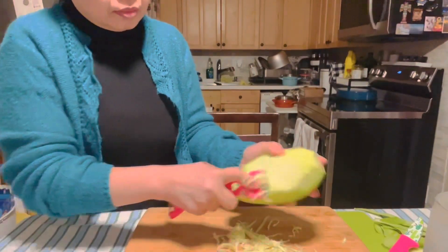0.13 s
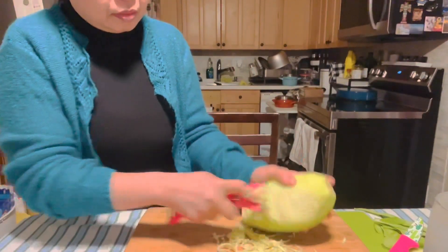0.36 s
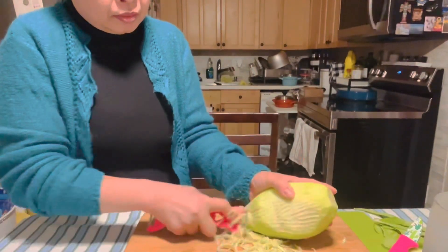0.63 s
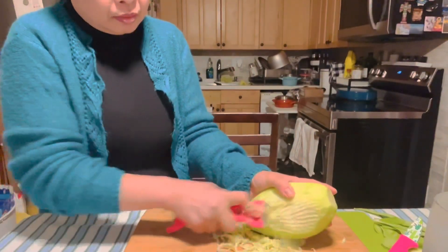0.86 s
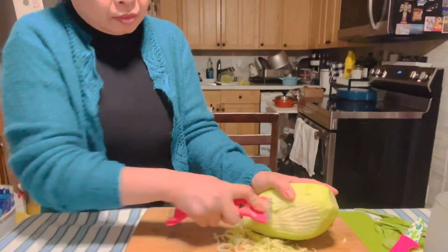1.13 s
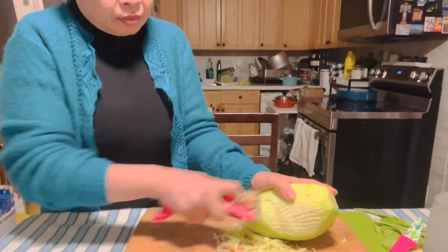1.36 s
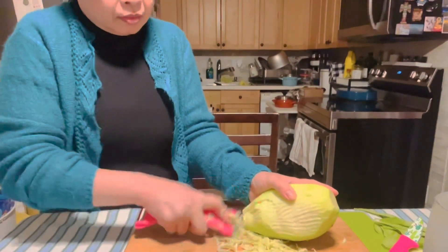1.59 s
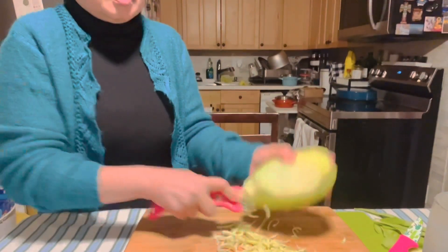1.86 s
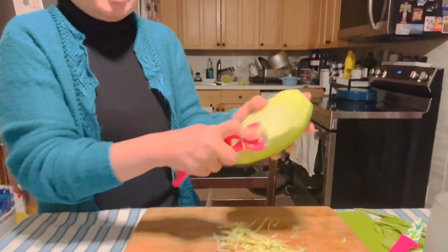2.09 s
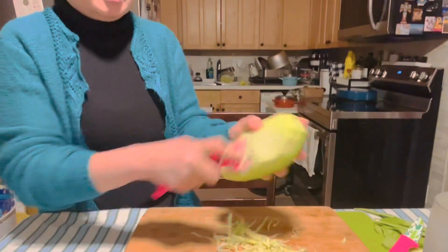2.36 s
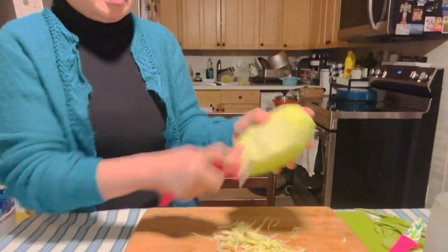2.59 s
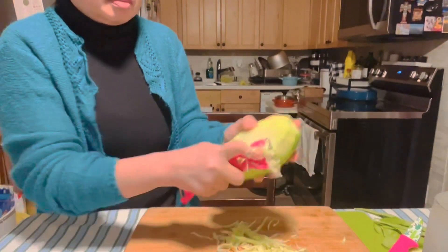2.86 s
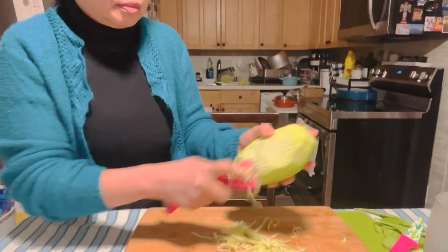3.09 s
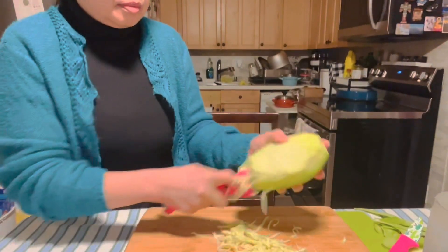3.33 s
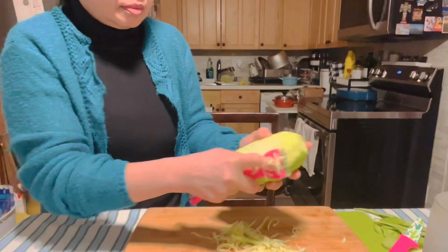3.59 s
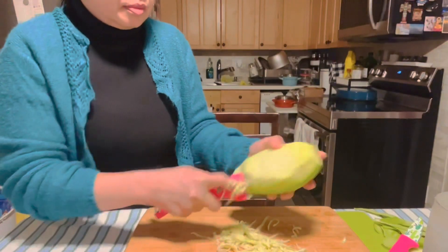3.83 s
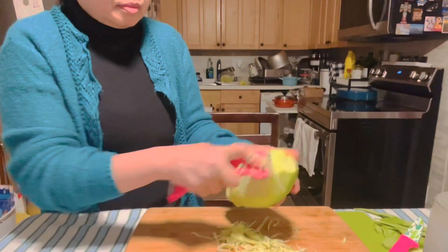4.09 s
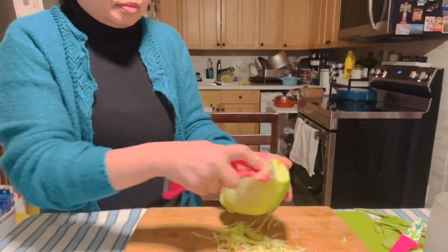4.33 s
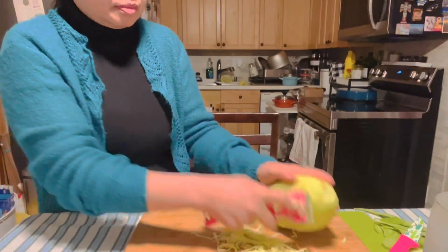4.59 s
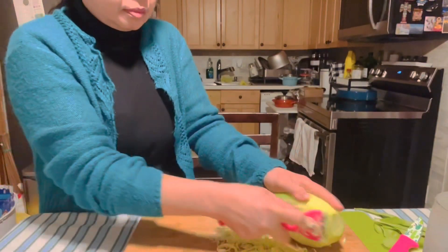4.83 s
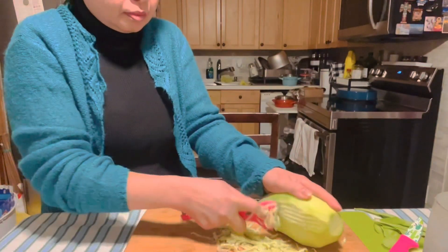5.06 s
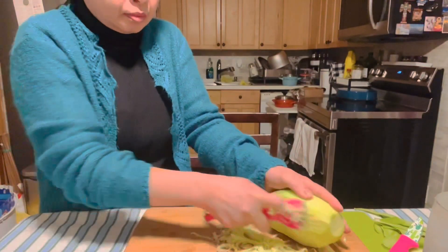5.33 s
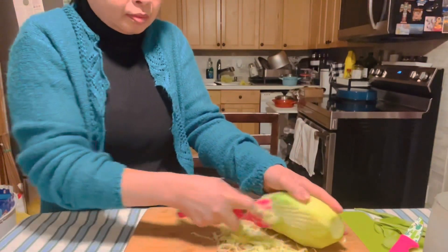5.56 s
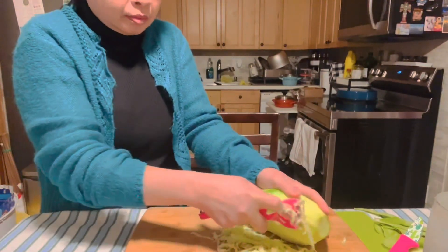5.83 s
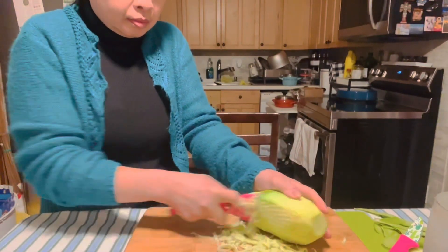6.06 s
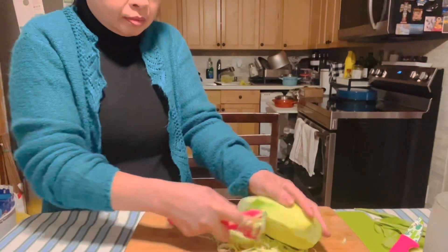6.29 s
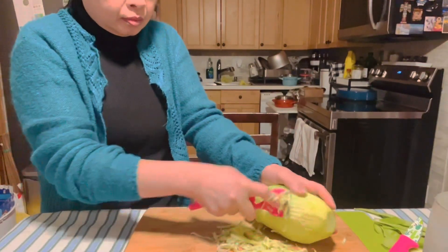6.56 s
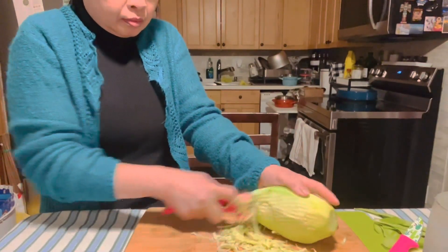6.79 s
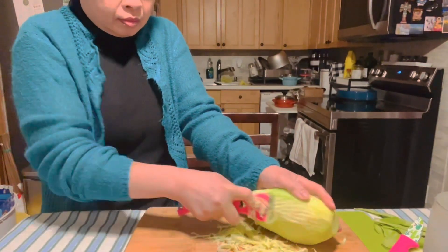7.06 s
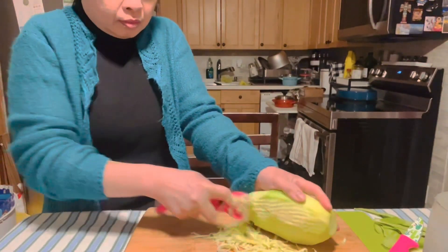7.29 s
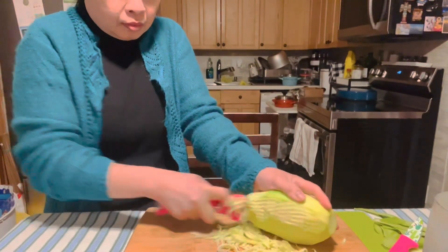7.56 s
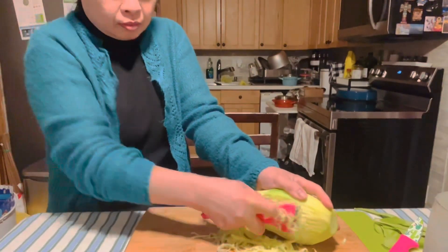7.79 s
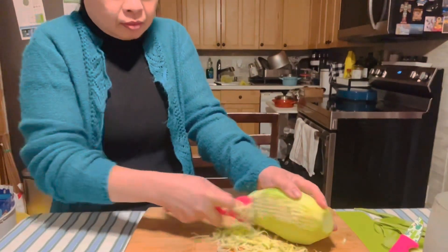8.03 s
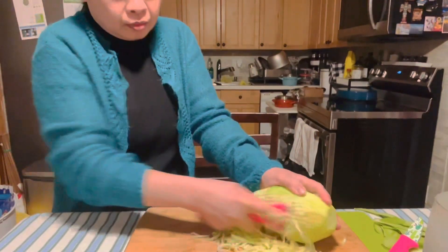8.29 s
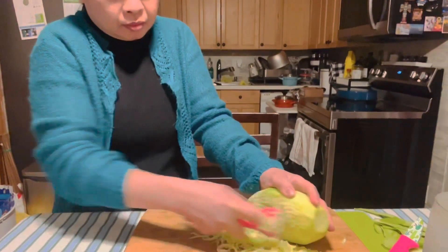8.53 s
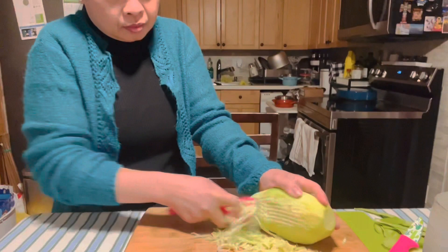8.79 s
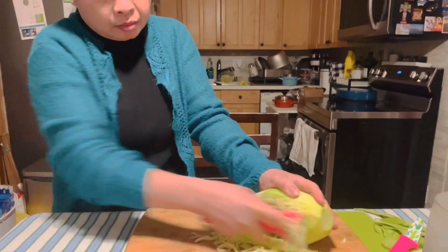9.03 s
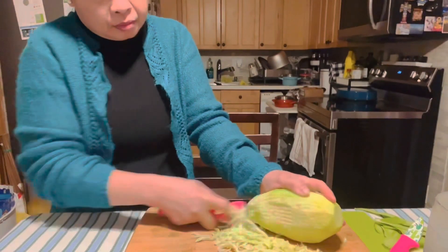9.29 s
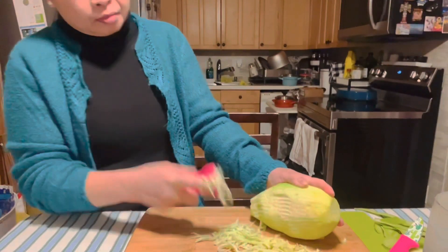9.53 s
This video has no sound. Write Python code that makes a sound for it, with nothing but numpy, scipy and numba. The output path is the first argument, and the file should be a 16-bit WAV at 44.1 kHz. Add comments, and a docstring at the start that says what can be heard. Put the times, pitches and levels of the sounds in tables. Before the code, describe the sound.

A hand shredder rasps in quick crisp strokes through a firm, wet green mango on a wooden board, with ticks, soft table thuds and faint fridge hum.

```python
"""Over a steady low kitchen rumble and a wavering fridge hum, a hand shredder ticks onto a peeled green mango
and tears its crisp flesh, stroke after stroke, while the table shakes and wet skin squeaks at times.
Tearing and juice fizz are rains of short dying sines, ticks are shaped noise, and squeaks and groans unsteady tones.
Resonances make the fruit answer dully, the thin blade ring a little, and board and table shake under the push."""
import sys
import numpy as np
from scipy import signal
from scipy.fft import rfft, irfft, next_fast_len
from scipy.io import wavfile
from scipy.ndimage import uniform_filter1d, map_coordinates
from numba import njit

SR = 44100
rng = np.random.default_rng(int(sys.argv[2]) if len(sys.argv) > 2 else 0)


def to_wav(s):
    """Save 16-bit WAV."""
    ch = np.atleast_2d(s).T  # columns
    pcm = np.round(np.clip(ch, -1, 1) * 32767)  # PCM
    wavfile.write(sys.argv[1], SR, pcm.astype(np.int16))


def boost_factor(decibels):
    """Convert a level in decibels to a linear amplitude factor."""
    exponent = np.asarray(decibels, float) / 20
    return 10 ** exponent


N = 425549
T = np.arange(N) / SR
SIZE = next_fast_len(N + SR // 2)
HZ = np.arange(SIZE // 2 + 1) * SR / SIZE
CONTROL_STEP = 22  # samples between control values


def through(x, response):
    """Linear filtering: a spectrum is multiplied by a frequency response."""
    return irfft(rfft(x, SIZE) * response, SIZE)[..., :N]


def colour(points):
    """Spectral envelope: gain through (Hz, dB) points joined on a log frequency axis."""
    hz, db = np.transpose(points)
    return boost_factor(np.interp(np.log(HZ + 1), np.log(hz), db))


def modes(resonances):
    """Modal superposition: damped resonances (Hz, width Hz, dB) add up, neighbours in opposite phase."""
    response = 0
    for k, (hz, width_hz, db) in enumerate(resonances):
        damping = 1j * HZ * width_hz
        response = response + (-1) ** k * boost_factor(db) * damping / (hz * hz - HZ ** 2 + damping)
    return response


def unit(x):
    """Power normalisation: scale to rms 1."""
    return x / np.sqrt(np.mean(x ** 2))


def walk(rate):
    """Random modulation: levels drawn about rate times a second and slewed; spread near 1."""
    k = max(int(SR / rate), 1)
    held = np.repeat(rng.standard_normal(N // k + 1), k)
    return unit(uniform_filter1d(held, k)[:N])


@njit
def rings(start, hz, cycles, size, length):
    """Damped free oscillation: each grain is a small sine that dies within some cycles."""
    out = np.zeros(length + 8192)
    for k in range(len(start)):
        z = size[k] + 0j
        turn = np.exp((2j * np.pi - 1 / cycles[k]) * hz[k] / SR)
        for i in range(min(int(3 * cycles[k] * SR / hz[k]), 8192)):
            out[start[k] + i] += z.imag
            z *= turn
    return out[:length]


def crunch(low_hz, high_hz, cycles, snap_db, patchy_db, count):
    """Granular fracture: snapping fibres give grains of scattered pitch and length; one rain for each channel."""
    # flesh tears unevenly: for some 30 ms one range of pitches snaps harder than another
    patches = patchy_db * rng.standard_normal((320, 14))
    last_cell = np.array(patches.shape)[:, None] - 1
    pair = []
    for when, pitch, snap, life in rng.random((2, 4, count)):
        hz = low_hz * (high_hz / low_hz) ** pitch
        patch_db = map_coordinates(patches, np.array([when, pitch]) * last_cell, order=1)
        size = boost_factor(patch_db - snap_db * np.log(1 - snap)) * np.sqrt(hz)
        lives = cycles * (.3 - np.log(1 - life))
        pair.append(rings((when * N).astype(np.int64), hz, lives, size, N))
    return unit(np.array(pair))


# spectrum of the room rumble: pitch_hz [Hz], level_db [dB per Hz, relative]
RUMBLE_SPECTRUM = [(18, -30.5), (30, -3.5), (194, 2.5), (461, -10), (721, -14.5), (1590, -27),
                   (5040, -26.5), (7470, -44.5), (8300, -37), (10500, -41.5), (11400, -30), (13000, -30),
                   (16000, -22.5)]


def kitchen():
    """Stationary noise and a pure tone: low room rumble that drifts, with a wavering fridge hum."""
    rumble = unit(through(rng.standard_normal((2, N)), colour(RUMBLE_SPECTRUM)))
    rumble = rumble * boost_factor(-70 + 2.4 * walk(3))
    hum_hz = 253 + .9 * walk(4)
    hum = np.sin(2 * np.pi * np.cumsum(hum_hz) / SR) * boost_factor(-73.5 + 1.5 * walk(6))
    return rumble + hum


# fruit knocks the board: start_s [s], level_db [dB, relative]
FRUIT_KNOCKS = [(0.426, -20.5), (0.457, -35.5), (0.572, -22.5), (0.6, -44), (1.239, -37), (1.556, -32),
                (1.58, -28), (4.579, -31.5), (4.598, -34), (4.641, -42), (5.24, -42), (5.727, -49),
                (6.757, -45), (7.754, -40), (8.788, -28.5), (9.182, -31.5)]
# resonances of the table: pitch_hz [Hz], width_hz [Hz], level_db [dB, relative]
TABLE_MODES = [(54, 5.1, -0.5), (85.5, 9.7, -6), (118, 19, -10), (204.4, 45, -11)]


def table_top(shake_db):
    """Forced and free vibration: the top wobbles under the sawing and rings on after each soft knock of the fruit."""
    push = np.zeros(N)
    for start_s, level_db in FRUIT_KNOCKS:
        i = int(start_s * SR)
        push[i:i + 400] += boost_factor(level_db + 6) * np.hanning(400)  # a soft contact lasts about 9 ms
    sawing = unit(through(rng.standard_normal((2, N)), modes(TABLE_MODES))) * boost_factor(shake_db - 3.5)
    return sawing + through(push, modes(TABLE_MODES))


# teeth landing, catching and fingers tapping:
# start_s [s], level_db [dB, relative], pitch_hz [Hz], thud_db [dB over the crack, relative]
TICK_EVENTS = [(0.0659, -30, 9390, -6.5), (0.0703, -17, 5100, -37), (0.1386, -24, 4970, -7.5),
               (0.4328, -30, 10500, -31), (0.4376, -13, 4800, -43), (0.5221, -28.5, 9920, 1),
               (0.5554, -18.5, 11000, -1.5), (0.7845, -23, 7500, -25), (0.7934, -25, 3710, -24),
               (1.1114, -21, 2720, -13.5), (1.2424, -22.5, 7200, -24), (1.4336, -33, 5100, -11),
               (1.5384, -24, 10600, -7), (1.7, -40.5, 1770, -12), (1.7406, -41.5, 1750, -27),
               (1.764, -11.5, 6590, -22), (1.7704, -18, 4100, -25), (1.8554, -21, 3370, -26),
               (2.0667, -40, 10300, -15), (2.0793, -26.5, 4130, -30), (2.1345, -28, 10400, -20),
               (2.302, -40, 2500, -20), (2.4418, -22.5, 5050, -29), (2.5311, -29, 10400, -13),
               (2.814, -20.5, 4690, -24), (2.822, -20, 4860, -32), (2.9033, -20, 4970, -22),
               (3.032, -38, 4500, -22), (3.1792, -36.5, 4520, -13), (3.1916, -26.5, 4650, -37),
               (3.2415, -36, 4750, -22), (3.2784, -22, 10800, -19), (3.5199, -50, 4880, -12),
               (3.5547, -26.5, 4980, -24), (3.5638, -23.5, 3240, -30), (3.644, -30, 4640, -27),
               (3.806, -38, 6500, -25), (3.998, -44, 5200, -30), (4.009, -33.5, 3910, -30),
               (4.0214, -35, 3950, -35), (4.0816, -31, 4000, -16), (4.3259, -30.5, 3980, -35),
               (4.3324, -36.5, 3740, -33), (4.3394, -34.5, 3850, -31), (4.4303, -37, 9880, -28),
               (4.4613, -34, 3200, -26), (4.6957, -38, 3750, -24), (4.775, -35, 4770, -25),
               (4.8595, -33, 10000, -3.5), (5.1791, -46.5, 4870, -16), (5.2255, -23.5, 4950, -17),
               (5.2544, -26.5, 3960, -18), (5.3485, -30, 5590, -19), (5.6855, -45, 5340, 1),
               (5.8396, -35, 9740, -3), (5.9044, -26.5, 10100, -10), (6.0294, -24, 6530, -6),
               (6.1599, -38, 9510, -6), (6.1883, -36, 9220, -4), (6.2228, -39, 5620, -19),
               (6.4682, -43, 7000, -12), (6.5294, -50, 9830, -12), (6.6568, -30.5, 5850, -18),
               (7.0366, -29, 5570, -15), (7.3801, -21, 5070, -24), (7.4704, -21, 7000, -14),
               (7.7433, -43, 9320, -10), (8.12, -52, 4500, -20), (8.1819, -29, 5030, -23),
               (8.5929, -30, 5100, -41), (8.6013, -23.5, 3930, -37), (8.6639, -19, 10500, -12.5),
               (8.6752, -15, 4670, -14.5), (8.7879, -22, 6610, -21), (9.0174, -38, 3160, -20.5),
               (9.0803, -23, 10400, -11), (9.3437, -39, 1773, 7), (9.5342, -43, 10100, -9),
               (9.551, -43.5, 3590, -5.5)]
# resonances of the fruit, also for the tearing: pitch_hz [Hz], width_hz [Hz], level_db [dB, relative]
FRUIT_MODES = [(240, 94, -14), (356, 56, -8.5), (493, 55, -5), (646, 58, 0.5), (782, 150, -1.5),
               (1042, 160, -7), (1298, 200, -10)]


def ticks():
    """Impulsive excitation: a millisecond crack around its pitch, a broad spit and a dull knock in the fruit."""
    t = np.arange(SR // 25) / SR
    crack, knock = np.zeros((2, N + len(t))), np.zeros(N + len(t))
    shape = (1 - np.exp(-t / 0.00026)) * (np.exp(-t / .0007) + 0.07 * np.exp(-t / 0.0099))
    for start_s, level_db, pitch_hz, thud_db in TICK_EVENTS:
        i = int(start_s * SR)
        pitched, spit = rng.standard_normal((2, 2, len(t)))
        band = [pitch_hz * 0.92, min(pitch_hz * 1.02, 16000)]
        sos = signal.butter(1, band, "bandpass", fs=SR, output="sos")
        ring = (signal.sosfilt(sos, pitched) * 3.2 + 0.16 * spit) * shape
        crack[:, i:i + len(t)] += boost_factor(level_db + 2) * ring / np.abs(ring).max(axis=1, keepdims=True)
        knock[i:i + len(t)] += boost_factor(level_db + thud_db + 11.5) * np.exp(-t / 0.00045)
    crack = through(crack[:, :N], colour([(800, -18), (2500, -9), (8000, 1), (16000, -16.5)]))
    return crack + through(knock[:N], modes(FRUIT_MODES))


# teeth set down and skid dry before they bite: start_s [s], level_db [dB, relative],
# fade [dB per s], fizz_db [juice fizz, dB over the skid]
LANDING_EVENTS = [(0.066, -42, 300, -5), (0.433, -38, 330, -3), (0.782, -42, 500, -4),
                  (1.112, -48, 120, -2), (1.425, -44, 200, -2), (1.761, -41, 170, -4),
                  (2.066, -42, 450, -11), (2.441, -48, 200, -9), (2.815, -40, 450, -12),
                  (3.179, -44, 470, -26), (3.556, -48, 410, -11), (3.998, -52, 250, -14),
                  (4.326, -50, 420, -15), (5.225, -44, 310, -18), (5.686, -47, 780, -5),
                  (7.036, -46, 400, -6), (7.38, -46, 500, -5), (7.744, -50, 170, 1), (8.178, -46, 520, -12),
                  (8.593, -45, 350, -12), (9.014, -60, 200, -6)]


def landings(t):
    """Sliding friction: powers of tearing, fizz and fruit body as the teeth land and their skid fades."""
    rise_db_per_s = 4200  # a steep short rise before each landing
    brace_db, brace_db_per_s = -24, 350  # the fruit creaks in the bracing hand ahead; dB over the skid
    body_db = -9.5  # over the skid
    power = np.zeros((3, len(t)))
    for start_s, level_db, fade_db_per_s, fizz_db in LANDING_EVENTS:
        ahead = np.maximum(start_s - t, 0)
        fade_db = fade_db_per_s * np.maximum(t - start_s, 0)
        skid = boost_factor(level_db - fade_db - rise_db_per_s * ahead) ** 2
        power += skid * boost_factor(np.array([[0], [fizz_db], [body_db]])) ** 2
        power[2] += boost_factor(level_db + brace_db - brace_db_per_s * ahead) ** 2 * (t < start_s)
    return power


RELEASE_DB_PER_S = 400  # teeth leaving the flesh
# pulls through the flesh: bite_s [s], run_up_s [s for 20 dB], length_s [s], bite_db [dB, relative],
# end_db [dB, relative], body_db [fruit body, dB over the tearing]
PULL_EVENTS = [(0.14, .04, .09, -42, -45, -2), (0.521, .056, .036, -40, -39, -1),
               (0.903, .105, .012, -36, -39, -3), (1.191, .055, .046, -36, -39, -6),
               (1.538, .146, .012, -37, -40, -3), (1.852, .05, .015, -38, -44, -4),
               (2.133, .025, .09, -41, -44, -10), (2.528, .011, .077, -39, -43, -3),
               (2.9, .025, .07, -39.5, -43, -4), (3.272, .03, .085, -39, -42, -4),
               (3.644, .024, .075, -49, -36, -6), (4.082, .004, .01, -46, -60, -11),
               (4.86, .03, .1, -53, -42, -5), (4.98, .11, .04, -38.5, -43, -1),
               (5.312, .045, .144, -43, -38.5, -3), (5.85, .02, .02, -53, -57, 0),
               (5.905, .05, .12, -42.5, -45, -4), (6.04, .03, .06, -49, -44, -2),
               (6.703, .09, .118, -42, -35, -7), (7.109, .068, .087, -39, -44, -6),
               (7.478, .072, .055, -36, -42, -6), (7.851, .027, .085, -46, -36, -4),
               (8.276, .043, .086, -40, -34.5, -7), (8.673, .02, .118, -38.5, -38, -7),
               (9.11, .055, .145, -37, -44.5, -4)]
# juice fizz [dB over the tearing]: start of the run-up, bite, end, as the teeth leave
FIZZ_COURSE_DB = (-4.0, 3.0, 1.5, -1.0)
# the fruit body sounds up as the teeth sink in [dB]: just before the bite, end
BODY_COURSE_DB = (-2.0, 0.0)


def pulls(t):
    """Progressive fracture: powers of tearing, fizz and fruit body over each pull, and the tearing alone."""
    leaving_s = .06
    power, pulling = np.zeros((3, len(t))), np.full(len(t), 1e-13)
    for bite_s, run_up_s, length_s, bite_db, end_db, body_db in PULL_EVENTS:
        end_s = bite_s + length_s
        db = np.interp(t, [bite_s, end_s], [bite_db, end_db]) - 20 * np.maximum(bite_s - t, 0) / run_up_s
        landed_s = max(row[0] for row in LANDING_EVENTS if row[0] < bite_s)
        pull = boost_factor(db - RELEASE_DB_PER_S * np.maximum(t - bite_s - length_s, 0)) ** 2 * (t >= landed_s)
        fizz_db = np.interp(t, [bite_s - run_up_s, bite_s, end_s, end_s + leaving_s], FIZZ_COURSE_DB)
        build_db = np.interp(t, [bite_s - .02, end_s], BODY_COURSE_DB)
        pulling += pull
        power += pull * boost_factor(np.array([0 * t, fizz_db, body_db + build_db])) ** 2
    return power, pulling


# the hand shifts blade and fruit between pulls; each group of rows is one continuous movement:
# start_s [s], level_db [rubbing, dB, relative], fizz_db [dB over the rubbing], body_db [dB over the rubbing]
HAND_MOVES = [
    [(4.38, -68, -5, -6), (4.43, -60, -4, -12), (4.45, -68, -8, -5), (4.48, -61, -13, -8),
     (4.53, -66, -15, -12), (4.62, -61, -12, -15), (4.67, -67, -10, -3), (4.7, -62, -8, -4),
     (4.76, -69, -12, 0), (4.83, -62, -12, 5)],
    [(5.05, -74, -5, -10), (5.2, -74, 5, -5)],
    [(5.55, -72, -5, -5), (5.6, -72, -7, -4), (5.67, -59, -18, -4), (5.73, -70, -10, 5), (5.77, -63, 0, 2),
     (5.83, -63, 4, 4)],
    [(6.12, -60, 0, 0), (6.19, -58, 0, 2), (6.25, -61, -6, 5), (6.34, -72, -3, 0), (6.56, -80, -6, 3),
     (6.61, -65, -5, -3)],
    [(9.33, -75, -14, 15), (9.41, -58, -28, 3), (9.48, -76, 0, 5), (9.56, -66, -15, -3),
     (9.65, -70, -28, -5)],
]


def handling(t):
    """Rubbing friction: powers of tearing, fizz and fruit body while blade and fruit are shifted."""
    power = np.zeros((3, len(t)))
    for rows in HAND_MOVES:
        start_s, *columns = np.transpose(rows)
        db, fizz_db, body_db = (np.interp(t, start_s, c) for c in columns)
        outside_s = np.maximum(np.maximum(start_s[0] - t, t - start_s[-1]), 0)
        db -= RELEASE_DB_PER_S * outside_s
        power += boost_factor(np.array([db, db + fizz_db, db + body_db])) ** 2
    return power


# how firmly the fruit rests on the board:
# start_s [s], rest_db [table shake at rest, dB, relative], over_db [shake, dB over the tearing of a pull]
PRESSING_COURSE = [(0, -57, -14), (0.45, -54, -8), (1.0, -55, -6), (1.6, -56, -4), (1.8, -58, -18),
                   (2.4, -60, -24), (3.05, -63, -24), (3.2, -76, -40), (4.5, -84, -40), (4.6, -62, -16),
                   (5.0, -57, -10), (5.3, -51, -12), (6.3, -53, -8), (6.9, -57, -7), (7.6, -57, -5),
                   (8.0, -56, -4), (8.35, -58, -12), (8.6, -61, -9), (9.3, -50, -5), (9.65, -57, -5)]


def pressing(t, pulling):
    """Force transmission: the push builds through a pull in two lag stages; powers of push and table shake."""
    lag_s = .025  # of each stage
    start_s, rest_db, over_db = np.transpose(PRESSING_COURSE)
    keep = np.exp(-CONTROL_STEP / (lag_s * SR))
    lagged = signal.lfilter([(1 - keep) ** 2], [1, -2 * keep, keep ** 2], pulling)
    push = boost_factor(np.interp(t, start_s, over_db)) ** 2 * lagged
    return push, push + boost_factor(np.interp(t, start_s, rest_db)) ** 2


def contact():
    """Incoherent addition of power: tearing, fizz and body over it, push on the board and table shake, in dB."""
    t = T[::CONTROL_STEP]
    pull_power, pulling = pulls(t)
    power = 1e-13 + landings(t) + pull_power + handling(t)
    push, shake = pressing(t, pulling)
    tear_db, fizz_db, body_db, push_db, shake_db = 10 * np.log10([*power, push, shake])
    courses = (tear_db, fizz_db - tear_db, body_db - tear_db, push_db, shake_db)
    return [np.interp(T, t, c) for c in courses]


# spectrum of the tearing: pitch_hz [Hz], level_db [dB, relative]
TEAR_SPECTRUM = [(900, -18.5), (1500, -13), (2200, -9), (3000, -3.5), (3700, -2), (5000, 3.5), (7500, -2.5),
                 (9500, 1), (16000, -6)]
# spectrum of the juice fizz: pitch_hz [Hz], level_db [dB, relative]
FIZZ_SPECTRUM = [(5000, -23), (7500, -0.5), (9000, -2), (11500, -0.5), (13000, -1), (15800, -4.5)]
# resonances of the plastic handle: pitch_hz [Hz], width_hz [Hz], level_db [dB, relative]
HANDLE_MODES = [(2850, 300, -1), (3200, 240, 0), (3880, 480, 1.5), (4800, 500, 1)]


def shredding(tear_db, fizz_db, body_db):
    """Stick-slip: teeth slip and catch in bursts shared by tearing and juice fizz; the fruit body rings with them."""
    catch = boost_factor(1.52 * walk(45) + 0.56 * walk(250))
    fibres = crunch(900., 12000., cycles=3.5, snap_db=2.0, patchy_db=3.5, count=60000)
    fibres = fibres * catch * boost_factor(1.2 * walk(30))
    fizz = crunch(5000., 17000., cycles=2.6, snap_db=1.5, patchy_db=2.5, count=70000)
    fizz = fizz * catch * boost_factor(1.2 * walk(60))
    jolts = crunch(198.5, 1600., cycles=1.5, snap_db=2.0, patchy_db=3.0, count=20000) * catch
    # many dry, toneless clicks of parting strands are sprinkled through the tearing
    strands = crunch(2500., 12000., cycles=.4, snap_db=4.0, patchy_db=1.0, count=3000)
    fibres = fibres + boost_factor(-12) * strands
    # without juice the teeth only slide, and the plastic handle colours the rub
    slide = np.clip((-fizz_db - 3.0) / 16, 0, .9)
    bite = unit(through(fibres, colour(TEAR_SPECTRUM))) * np.sqrt(1 - slide)
    rub = unit(through(fibres, modes(HANDLE_MODES))) * np.sqrt(slide) * boost_factor(-5.0)
    fizz = unit(through(fizz, colour(FIZZ_SPECTRUM))) * boost_factor(fizz_db + 1.5)
    body = unit(through(jolts, modes(FRUIT_MODES))) * boost_factor(body_db - 2.5)
    return (bite + rub + fizz + body) * boost_factor(tear_db + 3.5)


# resonances of the blade: pitch_hz [Hz], width_hz [Hz], level_db [dB over the direct sound]
BLADE_MODES = [(10600, 10, -2.5), (7300, 190, 2.5), (5900, 20, -22), (4770, 31, -8.5), (3016, 90, -10.5)]


def blade(x):
    """Sympathetic resonance: the thin blade rings along with the direct sound."""
    return through(x, 1 + modes(BLADE_MODES))


# resonances of the cutting board: pitch_hz [Hz], width_hz [Hz], level_db [dB, relative]
BOARD_MODES = [(215, 45, 0), (350, 70, 0), (480, 60, -2)]


def board(push_db):
    """Forced vibration: the cutting board buzzes dully under the pushed fruit."""
    jolts = crunch(180., 600., cycles=1.5, snap_db=2.0, patchy_db=3.0, count=6000)
    return unit(through(jolts, modes(BOARD_MODES))) * boost_factor(push_db - 5.5)


# the fruit groans on one dull note when the teeth judder:
# start_s [s], level_db [dB, relative], pitch_hz [Hz, mean]
GROAN_EVENTS = [(.172, -42, 690), (.54, -39, 770), (.912, -43, 358), (1.225, -46, 350), (1.82, -48, 720),
                (5.315, -44, 660), (5.42, -45, 650), (7.91, -47, 380), (8.285, -44, 479), (9.085, -45, 485),
                (9.13, -45, 670)]
# wet fingers or blade squeak faintly on the skin:
# start_s [s], length_s [s], pitch_hz [Hz, mean], level_db [dB, relative]
SQUEAK_EVENTS = [(4.49, .07, 3680, -70), (4.55, .1, 2610, -68), (4.56, .07, 3140, -73),
                 (6.345, .11, 1920, -76), (6.35, .08, 1420, -75), (9.39, .04, 790, -60)]


def squeaks_and_groans():
    """Friction-driven oscillation: each squeak or groan is an unsteady tone that swells and fades."""
    groan_s = .035
    out, waver, flutter = np.zeros(N), 1 + .025 * walk(90), boost_factor(3.5 * walk(110))
    groans = [(start_s, groan_s, hz, db) for start_s, db, hz in GROAN_EVENTS]
    for start_s, length_s, pitch_hz, level_db in SQUEAK_EVENTS + groans:
        span = slice(int(start_s * SR), int((start_s + length_s) * SR))
        tone = np.sin(2 * np.pi * np.cumsum(pitch_hz * waver[span]) / SR)
        swell = np.sin(np.pi * (T[span] - start_s) / length_s)
        out[span] += tone * boost_factor(level_db) * flutter[span] * swell
    return out


def room(x):
    """Diffuse reverberation: short noise tail of a furnished kitchen, unlike in the two channels."""
    t60_s = .22
    t = np.arange(SR // 3) / SR
    tail = rng.standard_normal((2, len(t))) * np.exp(-np.log(1000) * t / t60_s) * (t > .004)
    tail = tail / np.sqrt(np.sum(tail ** 2) / 2)
    return through(x, rfft(tail, SIZE) * colour([(300, -5.5), (1000, -0.5), (4000, -2.5), (16000, -13.5)]))


# left and right channels, with phase and likeness stepped over pitch: pitch_hz [Hz],
# phase [half turns of left over right], likeness [0-1], level_db [left minus right, dB, for equal inputs]
CHANNEL_DIFFERENCES = [(60, 0, .9, .5), (800, .1, .8, 1), (2000, .13, .5, 1.5), (3400, .3, .4, 2),
                       (4300, .8, .5, 4), (6200, .4, .45, 5), (7000, -.25, .4, 4), (7950, -.96, .98, 0),
                       (8650, -1.04, .98, 0), (9250, -1.5, .7, 0), (9800, -1.98, .99, 0),
                       (10900, -2.02, .99, 0), (11500, -2.5, .6, 0), (12000, -2.97, .99, 0),
                       (13000, -3.03, .99, 0), (13500, -3.5, .5, 0), (14000, -3.98, .99, 0),
                       (16000, -4.03, .99, 0)]


def left_and_right(pair):
    """Interchannel coherence: stepped phase and likeness over pitch set how far the right resembles the left."""
    hz, phase, like, db = np.transpose(CHANNEL_DIFFERENCES)
    phase, like, db = (np.interp(HZ, hz, c) for c in (phase, np.clip(like, 0, 1), db))
    left = through(pair[0], boost_factor(db / 2))
    shared = through(pair[0], like * np.exp(-1j * np.pi * phase) * boost_factor(-db / 2))
    own = through(pair[1], np.sqrt(1 - like ** 2) * boost_factor(-db / 2))
    return np.array([left, shared + own])


def scene():
    """Superposition: shredder, board, squeaks, room tail, table and kitchen add up in the two channels."""
    tear_db, fizz_db, body_db, push_db, shake_db = contact()
    near = blade(ticks() + shredding(tear_db, fizz_db, body_db))
    near = near + board(push_db) + squeaks_and_groans()
    return left_and_right(kitchen() + table_top(shake_db) + near + boost_factor(-7.5) * room(near[0]))


def band_limit(x):
    """A steep low-pass at the top of the band."""
    return signal.sosfilt(signal.butter(12, 16820, fs=SR, output="sos"), x)


def record(dry):
    """Band limiting: the phone cuts the deepest bass and the top."""
    mix = signal.sosfilt(signal.butter(2, 32, "highpass", fs=SR, output="sos"), dry)
    mix = signal.sosfilt(signal.ellip(8, .2, 60, 15850, fs=SR, output="sos"), mix)
    return band_limit(mix)


dry = scene()
out = record(dry)
to_wav(out)
```